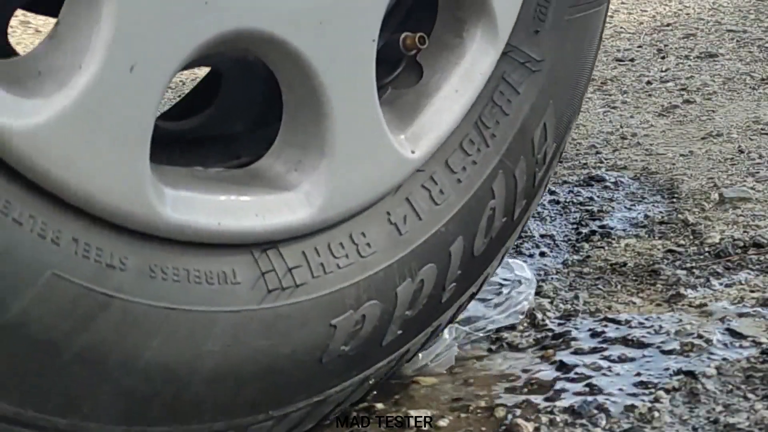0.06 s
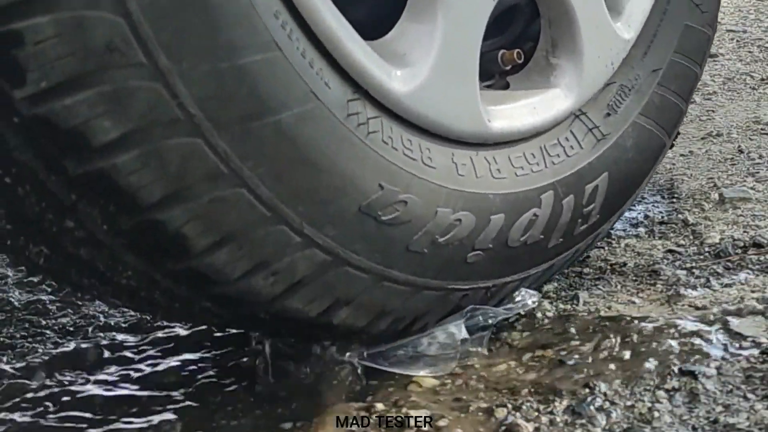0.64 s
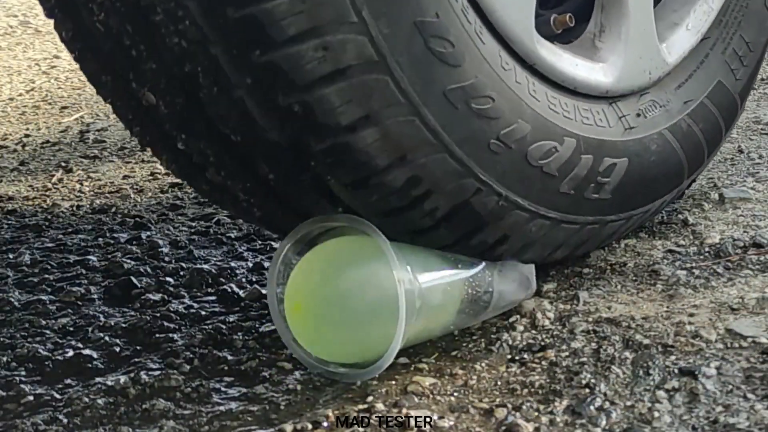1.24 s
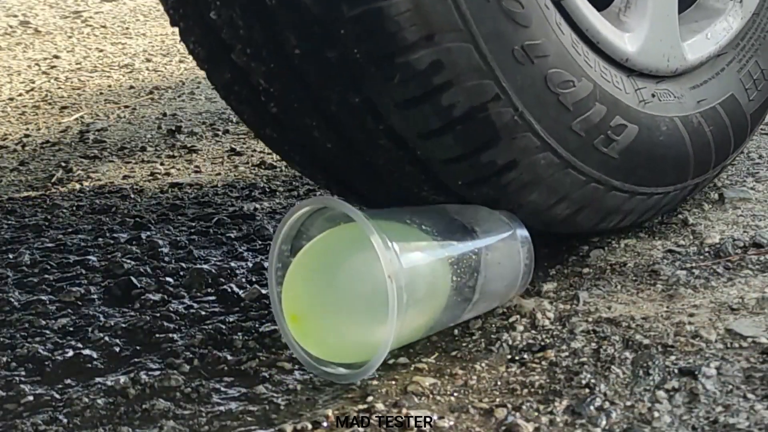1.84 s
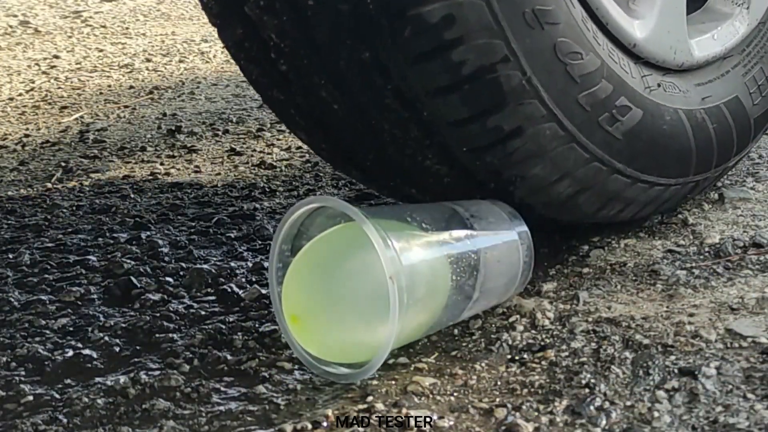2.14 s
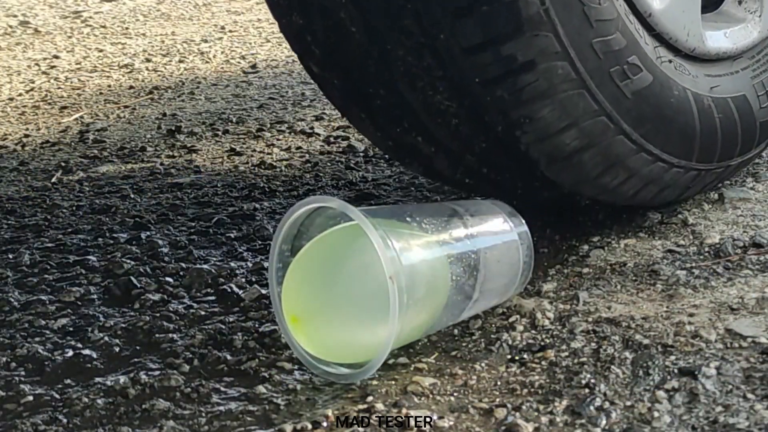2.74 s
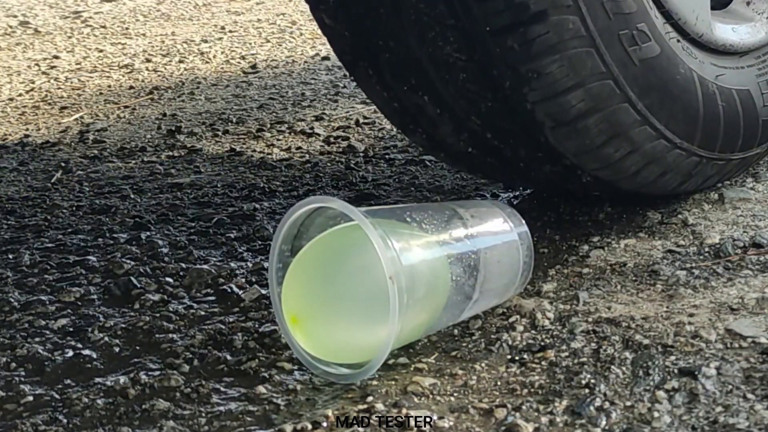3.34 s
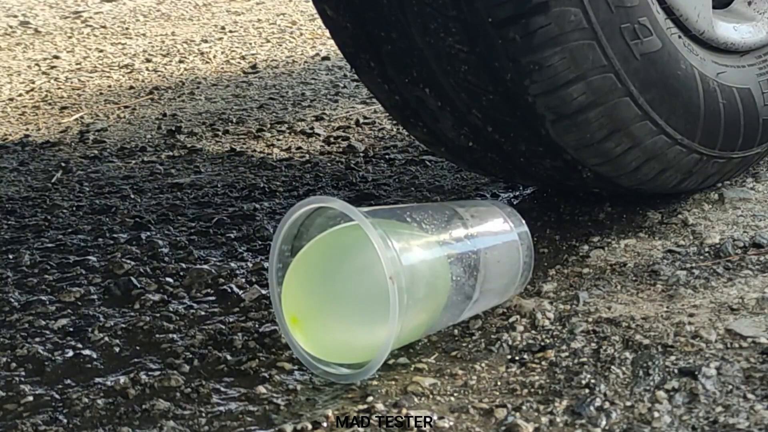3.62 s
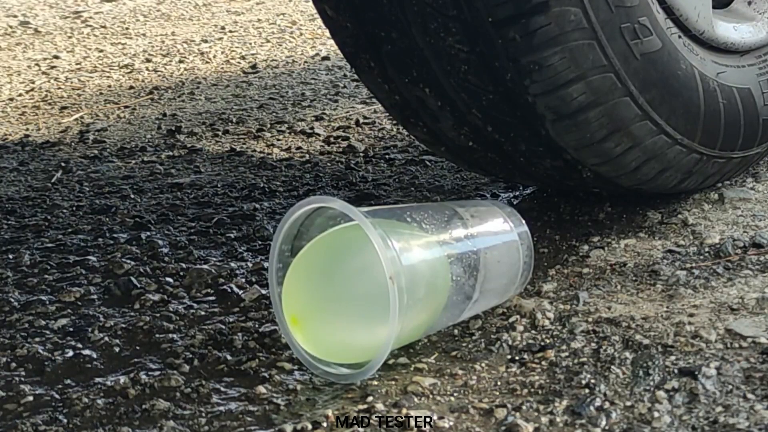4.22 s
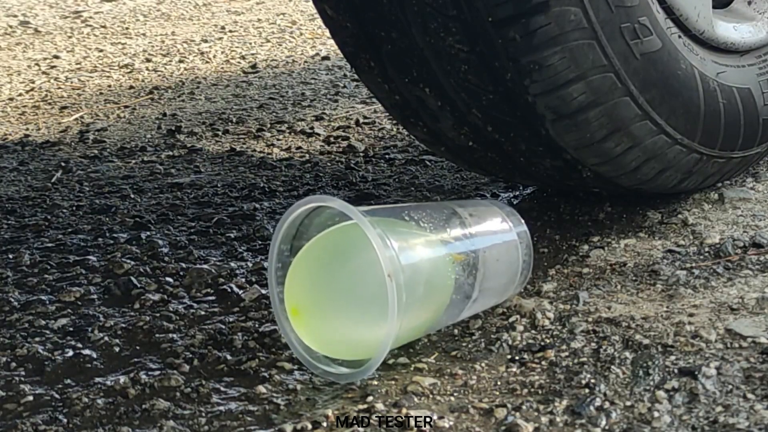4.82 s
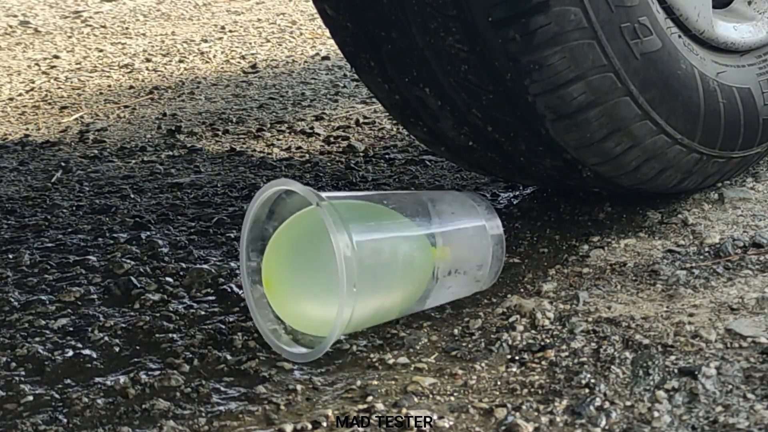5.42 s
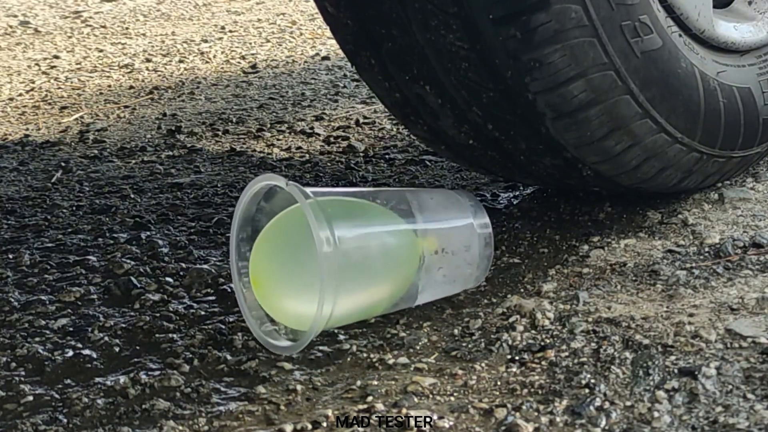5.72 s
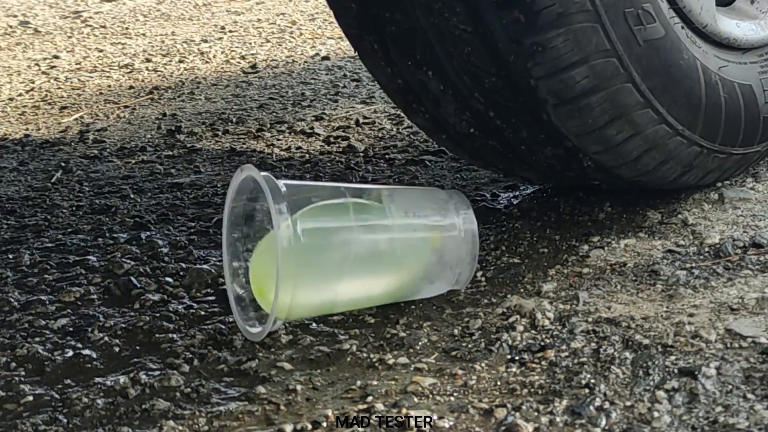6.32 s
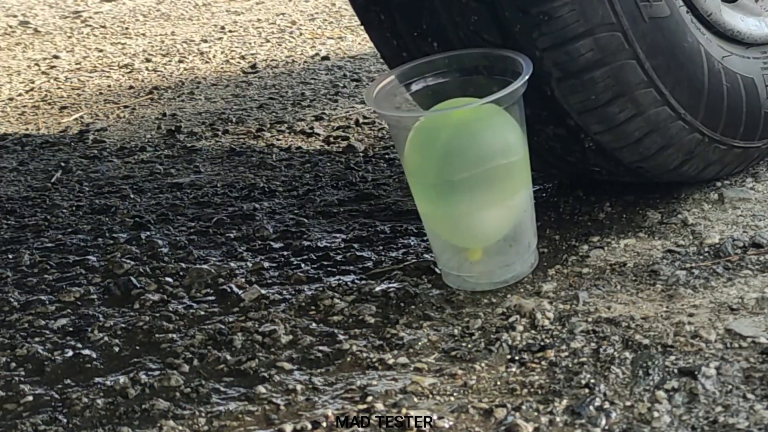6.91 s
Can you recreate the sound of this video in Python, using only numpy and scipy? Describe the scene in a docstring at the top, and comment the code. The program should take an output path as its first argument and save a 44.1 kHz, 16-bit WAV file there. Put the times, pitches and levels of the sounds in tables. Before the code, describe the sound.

Everything sounds backwards, close up and outdoors: each hit swells and stops dead, over a faint, low car idle. At first a tyre grinds and clicks on wet gravel, with a hollow plastic pop at about 0.5 seconds. From 0.8 to 1.9 seconds thin plastic cups buckle in a loud, dense run of sharp snaps and crinkles, mixed with short thumps and high, fizzy squirts from a water balloon. From 2 to 3.5 seconds the gravel thins to quiet, scattered clicks. A brief rasping squeak comes near 3.6 seconds, then mostly the engine hum. From about 4.7 seconds a cup taps and scrapes on the stones, squeaking again around 5.5. Its hollow knocks and dragging build to their loudest between 6.1 and 6.3 seconds, then drop to light taps and faint scraping until about 7 seconds.

```python
"""Plastic crunches and snaps in reverse over a low idle: every hit swells out of its scatter and stops dead.
It is a car tyre rolling over thin plastic cups of water balloons on wet gravel, all running backwards.
Stones grind and click under the tread, cup walls crease and buckle, a balloon thumps and squirts.
The car creeps away, and a last cup scrapes and knocks hollowly on the stones as it rights itself."""
import sys
import numpy as np
from scipy import signal
from scipy.fft import rfft, irfft, next_fast_len
from scipy.io import wavfile

SR = 44100
rng = np.random.default_rng(int(sys.argv[2]) if len(sys.argv) > 2 else 0)


def put_to_file(sound):
    """Save the sound as 16-bit audio at rate SR, in the file named by the first command-line argument."""
    columns = np.atleast_2d(sound).T  # one column per channel
    safe = np.clip(columns, -1, 1)
    whole_steps = np.round(safe * 32767)
    wavfile.write(sys.argv[1], SR, whole_steps.astype(np.int16))


N = 311331
TIME = np.arange(N) / SR
PORT_LAG_S, DRAG_STOP_S = .00012, .0051

# the tyre on wet gravel, until it comes to rest: t/s, grind/dB, crackle/dB
TYRE_ROLL = [(0, -46, -48.5), (0.27, -53, -56.5), (0.55, -44.5, -46), (0.64, -52, -49), (0.73, -42, -41.5),
             (0.96, -48.5, -45.5), (1.25, -46.5, -48.5), (1.44, -41.5, -43.5), (1.54, -61, -52),
             (1.7, -49.5, -45.5), (1.94, -52, -54), (2, -58.5, -66), (2.62, -58.5, -60.5),
             (2.9, -60.5, -68), (3.45, -64.5, -68.5), (3.66, -67.5, -90)]
# a cup drags harder and harder until it catches: end/s, hollow/dB, crackle/dB
CUP_DRAGS = [(1.7, -49, -48.5), (1.93, -43.5, -47), (5.301, -62, -55), (5.461, -49.5, -60.5),
             (5.78, -67, -55), (5.965, -61.5, -62), (6.3, -35, -56.5), (6.412, -54.5, -50),
             (6.68, -67.5, -61), (7.043, -63, -57)]


def from_db(db):
    """Decibels to gain."""
    return 10 ** (np.asarray(db) / 20)


def joined_db(db, gain):
    """Level of two unrelated sounds together, one in dB and one as a gain."""
    return 20 * np.log10(np.hypot(from_db(db), gain))


def rms_one(x):
    """Scale to unit rms."""
    return x / np.sqrt(np.mean(x ** 2) + 1e-20)


def in_time(rows):
    """Each column of an automation curve, at every sample."""
    times, *columns = np.transpose(rows)
    return [np.interp(TIME, times, column) for column in columns]


def at_hz(points, hz):
    """Read an EQ curve in dB on a log-frequency axis."""
    f, db = np.transpose(points)
    return np.interp(np.log(hz + 1), np.log(f), db)


def colour(x, gain):
    """Filter by a gain that is a function of frequency; unit rms."""
    size = next_fast_len(x.shape[-1], True)
    hz = np.arange(size // 2 + 1) * SR / size
    return rms_one(irfft(rfft(x, size) * gain(hz), size)[..., :x.shape[-1]])


def equalise(x, curve):
    """Shape by an EQ curve; unit rms."""
    return colour(x, lambda hz: from_db(at_hz(curve, hz)))


def pan(db):
    """Stereo gains, db being left minus right."""
    return from_db([[db / 2], [-db / 2]])


def ports(x, lag_s=PORT_LAG_S):
    """Direct sound reaches the left microphone a little before the right."""
    delayed = np.clip(np.arange(len(x)) - round(lag_s * SR), 0, len(x) - 1)
    return np.array([x, x[delayed]])


def diffuse(size, apart_db):
    """Stereo noise, wider as apart_db lifts each side's own part over the common one."""
    white = rng.standard_normal((3, size))
    return rms_one(ports(white[0]) + from_db(apart_db) * white[1:])


def swell(lead, rise_s, stop_s):
    """A reversed decay: slow growth as the time left (lead) runs out, then an abrupt stop."""
    return np.exp(-np.maximum(lead, 0) / rise_s + np.minimum(lead, 0) / stop_s)


def impulses(per_s, spread_db):
    """Randomly timed spikes, most small and a few large."""
    return (rng.random(N) < per_s / SR) * from_db(spread_db * np.minimum(rng.exponential(1, N), 3.5))


def bursts(per_s, spread_db, length_s):
    """Envelope of tiny fractures or slips, each swelling and stopping dead; unit rms."""
    decay = np.exp(-1 / (length_s * SR))
    energy = signal.lfilter([1], [1, -decay], impulses(per_s, spread_db) ** 2 + 1e-12)
    return rms_one(np.sqrt(energy[::-1]))


def grains(per_s, spread_db, low_hz, high_hz, cycles, pitches=16):
    """Random slips on stone, each a reversed tick at one of a set of pitches."""
    clicks = impulses(per_s, spread_db) * rng.choice([-1, 1], N)
    dealt, ticks = rng.integers(0, pitches, N), np.zeros(N)
    for k, hz in enumerate(np.geomspace(low_hz, high_hz, pitches)):
        r, w = np.exp(-hz / (cycles * SR)), 2 * np.pi * hz / SR
        ring = signal.lfilter([1, 0, -1], [1, -2 * r * np.cos(w), r * r], clicks * (dealt == k) + 1e-18)
        ticks += ring * np.sqrt((1 - r) * w)
    return ports(rms_one(ticks[::-1]))


def wall_db(hz):
    """Lift given by the cup wall's resonances."""
    # wall modes: f/Hz, width/Hz, lift/dB
    modes = [(2800, 270, 1), (3570, 430, 3), (4240, 170, 0.5), (6660, 120, 6.5), (8360, 580, 4.5),
             (10060, 330, 3.5), (12100, 820, 1.5)]
    return sum(db / (1 + (2 * (hz - f) / width) ** 2) for f, width, db in modes)


def ripple_db(hz, step_hz=420, depth_db=3):
    """The close, irregular resonances of one crease, drawn afresh each time."""
    grid = np.arange(0, SR / 2, step_hz)
    return np.interp(hz, grid, rng.normal(0, depth_db, len(grid)))


def hit(lead, crack_db, tilt_db, folds_hz, lift_db, ring_hz, cycles, ring_db, echo_db, scatter_db,
        edge_s, pan_db):
    """One reversed snap or knock: a crack, a short hollow ring, and their scatter off tyre and ground."""
    # tone of cracking plastic: f/Hz, level/dB
    plastic_eq = [(500, -10), (1200, -8), (2200, -2), (4000, 0.5), (8500, -5.5), (11000, -6), (13000, -11),
                  (16000, -20.5)]
    size = len(lead)
    lag_s = PORT_LAG_S * rng.uniform(0.65, 1.4)

    def crack_tone(hz):
        """Each fold adds its own resonances and tilt per octave to the wall's."""
        fold = sum(lift_db / (1 + ((hz / f - 1) / .07) ** 2) for f in folds_hz)
        tilt = tilt_db * np.log2(np.clip(hz, 2000, 11000) / 5000)
        return from_db(at_hz(plastic_eq, hz) + wall_db(hz) + fold + tilt + ripple_db(hz))

    def echo_tone(hz):
        """A band around the ring, with top and bottom rolled off."""
        band = 1 / np.sqrt(1 + (cycles * (hz / ring_hz - ring_hz / (hz + 1))) ** 2)
        return band / (1 + (hz / 3500) ** 2) * hz ** 2 / (hz ** 2 + 150 ** 2)

    noise = [rng.standard_normal(size), diffuse(size, apart_db=12.5), diffuse(size, apart_db=17)]
    noise = colour(np.vstack(noise), crack_tone)
    crack = noise[0] * swell(lead, .00065 + edge_s / 2, edge_s)
    crack = ports(crack / np.sqrt(np.sum(crack ** 2) / ((0.0024 + edge_s) * SR)), lag_s)
    near = from_db(-12.5) * noise[1:3] * swell(lead, .003, 0.0006)
    scatter = from_db(scatter_db + 7) * noise[3:] * swell(lead, 0.014, 0.000386)
    # the air in the cup rings, heavily damped; longer rings peak lower for the same energy
    ring = 3.4 * np.sqrt(ring_hz / 1000 / cycles) * np.sin(2 * np.pi * ring_hz * lead) * (lead > 0)
    ring *= np.exp(-np.abs(lead) * ring_hz / cycles)
    ring *= 1 - np.exp(-np.abs(lead) / (0.24 * edge_s))   # softens the stop
    low_cut = signal.butter(2, ring_hz * 0.29, "high", fs=SR, output="sos")
    ring = ports(signal.sosfilt(low_cut, ring[::-1])[::-1], lag_s)
    echo = from_db(echo_db) * colour(diffuse(size, apart_db=-5), echo_tone) * swell(lead, 0.011, 0.0016)
    # only the short waves of the crack are beamed to one side
    return from_db(crack_db) * pan(pan_db) * (crack + near + scatter) + from_db(ring_db) * (ring + echo)


def place(hits, size=5400, tail=700):
    """Lay each row (t/s, then the settings of a hit) on the timeline."""
    track = np.zeros((2, N + 2 * size))
    lead = (size - tail - np.arange(size)) / SR
    for t, *settings in hits:
        start = round(t * SR) + tail
        track[:, start:start + size] += hit(lead, *settings)
    return track[:, size:size + N]


def waver(per_s=9, depth=.6):
    """A value that wanders around 1."""
    grid = np.arange(0, TIME[-1] + 1, 1 / per_s)
    return np.interp(TIME, grid, rng.normal(1, depth, len(grid)))


def engine():
    """A muffled rumble with wavering harmonics that follow the firing rate, over a bed of open air."""
    # tones of the rumble and the air: f/Hz, level/dB
    rumble_eq = [(25, -47.5), (50, -29.5), (68, -9), (82, -6.5), (97, -0.5), (113, 3), (145, -4.5),
                 (180, -13.5), (205, -11), (270, -14.5), (320, -10), (600, -22.5), (1500, -59.5),
                 (4000, -69)]
    air_eq = [(400, 4.5), (1000, -1), (1500, -5.5), (2400, -15), (4200, -20), (6500, -28.5), (16000, -29)]
    # loudness of the idle: t/s, level/dB
    idle = [(0, -47), (1.1, -48.5), (3.0, -48), (4.4, -46.5), (6.5, -49.3), (6.9, -45.5)]
    # firing rate as the car creeps: t/s, f/Hz
    firing = [(0, 41), (1.3, 41), (2.55, 41.1), (3.0, 38.5), (3.5, 38), (3.9, 42.5), (4.2, 43.3),
              (4.55, 41.7), (5.0, 40.4), (5.3, 39.3), (5.6, 36.5), (7.05, 40)]
    # firing harmonics: multiple, level/dB re rumble
    orders = [(2, -10.5), (3, -10.5), (4, -18), (5, -16), (6, -18)]
    rumble = equalise(diffuse(N, apart_db=-12.5), rumble_eq)
    phase = 2 * np.pi * np.cumsum(in_time(firing)[0]) / SR
    hum = sum(from_db(db) * rms_one(waver() * np.sin(k * phase + waver())) for k, db in orders)
    air = equalise(diffuse(N, apart_db=20), air_eq)
    return from_db(in_time(idle)[0]) * (rumble + hum) + from_db(-56) * air


def drag_gain():
    """Envelope of the cups' hollow dragging."""
    return sum(from_db(db) * swell(end - TIME, 0.18, DRAG_STOP_S) for end, db, _ in CUP_DRAGS)


def gravel():
    """Stones grind under the tread and dragging cups; wet grit and creased plastic crackle on top."""
    # tones of the stones and the grit: f/Hz, level/dB
    grind_eq = [(200, -19), (450, 1), (800, 2), (1100, -5), (1600, -1), (2400, -20.5), (4500, -30.5)]
    grit_eq = [(1000, -18), (2200, 0.5), (4000, 0), (8500, -5.5), (11000, -10.5), (13000, -11),
               (16000, -26.5)]
    tyre_db, grit_db = in_time(TYRE_ROLL)
    grind_db = joined_db(tyre_db, from_db(-6.5) * drag_gain())
    crushing = bursts(per_s=100, spread_db=-1, length_s=0.0015)
    load = np.clip((grind_db + 56) / 16, 0, 1)   # stones only tick under a heavy load
    ticks = load * grains(per_s=330, spread_db=1.5, low_hz=700, high_hz=1950, cycles=0.98)
    stones = ticks + (1.1 * crushing + 1.3) * diffuse(N, apart_db=10.5)
    grit = crushing * diffuse(N, apart_db=10) + from_db(0.5) * diffuse(N, apart_db=11)
    strays = bursts(per_s=9, spread_db=1.5, length_s=0.00072) * diffuse(N, apart_db=0)
    grit = colour(grit + from_db(-14.5) * strays, lambda hz: from_db(at_hz(grit_eq, hz) + wall_db(hz)))
    return from_db(grind_db) * equalise(stones, grind_eq) + from_db(grit_db + 1) * grit


def rubbing():
    """A rim rubs under the tyre or drags over stones, and the weighted cup answers hollowly."""
    # tone of the cup's body: f/Hz, level/dB
    hollow_eq = [(110, -20.5), (210, 5), (320, -3.5), (420, -4), (600, -5), (780, -15.5), (1200, -21.5),
                 (3000, -44.5)]
    slips = grains(per_s=420, spread_db=2.5, low_hz=234, high_hz=640, cycles=2)
    slips += from_db(-2.5) * diffuse(N, apart_db=-7)
    level_db = joined_db(in_time(TYRE_ROLL)[0] - 7.5, drag_gain())
    return from_db(level_db) * equalise(slips, hollow_eq)


def pinches(tilt_db=-2, facet_hz=3300, lift_db=1, cycles=2.6, echo_db=-7, scatter_db=-14,
            edge_s=0.00066, pan_db=-3):
    """Stones pinched by the tread click, each at its own pitch."""
    # stone clicks: t/s, crack/dB, ring/Hz, ring/dB
    clicks = [(0.0258, -45, 1500, -54), (0.0838, -35, 1140, -38), (0.107, -36.5, 1840, -34),
              (0.1914, -36, 1760, -38), (0.2062, -33.5, 1000, -38), (0.219, -40, 1270, -45),
              (0.2388, -51, 1500, -59), (0.2712, -42.5, 1500, -52), (0.3077, -37.5, 1670, -46),
              (0.345, -31.5, 1550, -28), (0.3922, -35.5, 1500, -42), (0.4636, -38, 1500, -43),
              (0.5357, -41, 1800, -43), (0.58, -34, 1450, -37.5), (0.706, -39, 1200, -43),
              (0.713, -47, 1500, -52), (0.388, -37, 1280, -28), (0.4522, -42, 1690, -31.5),
              (0.483, -33, 1580, -52), (0.611, -33.5, 1670, -37), (0.661, -36, 1420, -41),
              (0.697, -48, 870, -27.5), (0.745, -50, 1500, -26), (2.075, -53, 1350, -48),
              (2.158, -53, 1290, -62), (2.2119, -50, 1130, -48), (2.25, -74, 1340, -55.5),
              (2.33, -48.5, 1400, -59), (2.354, -48.5, 1290, -53), (2.39, -47, 1190, -40.5),
              (2.4517, -57, 1080, -50), (2.4892, -69, 1340, -41.5), (2.539, -49, 990, -50.5),
              (2.5628, -48, 1160, -51), (2.585, -46, 3200, -40), (2.6157, -59, 1100, -54),
              (2.625, -60, 1300, -49), (2.7307, -62, 1160, -54), (2.755, -48, 1120, -46),
              (2.8097, -48.5, 1570, -44.5), (2.915, -66, 3520, -50.5), (3.093, -57.5, 958, -62),
              (3.408, -56, 1610, -47), (3.424, -49.5, 1540, -44)]
    return place((t, db, tilt_db, (facet_hz,), lift_db, ring_hz, cycles, ring_db,
                  echo_db, scatter_db, edge_s, pan_db) for t, db, ring_hz, ring_db in clicks)


def spray():
    """Water squirts from a squeezed balloon; the droplets fizz high above the crunch."""
    # squirts: end/s, level/dB
    squirts = [(0.875, -43), (1.16, -40.5), (1.42, -46.5), (1.69, -43)]
    # tone of the droplets: f/Hz, level/dB
    fizz_eq = [(4000, -25), (9000, -5.5), (12500, -1), (14500, -2.5), (16000, -8)]
    flow = sum(from_db(db) * swell(end - TIME, rise_s=0.15, stop_s=.008) for end, db in squirts)
    drops = bursts(per_s=500, spread_db=2.5, length_s=0.0006) * diffuse(N, apart_db=4)
    return flow * equalise(drops, fizz_eq)


def squeaks():
    """The rim sticks and slips: each slip rasps and rings the cup's modes, swelling to a dead stop."""
    # rim slips: end/s, level/dB
    slips = [(3.575, -44.5), (3.614, -42), (5.472, -50), (5.515, -44.5), (5.563, -44.5), (6.659, -64)]
    # modes of the whole cup: f/Hz, rise/s, level/dB
    modes = [(315, 0.044, -1.5), (530, 0.025, -5), (789, 0.016, -8), (1550, 0.013, -13.5),
             (3140, 0.018, -10), (3330, 0.013, -3), (4520, .02, -25)]
    # tone of the scrape: f/Hz, level/dB
    rasp_eq = [(200, -22), (400, 6), (750, 4), (1300, -11.5), (3000, -20.5), (5000, -17.5), (9000, -32)]
    kicks, chirps = np.zeros(N), np.zeros(N)
    for end, db in slips:
        kicks[round(end * SR)] = from_db(db)
    for hz, rise_s, db in modes:
        r, w = np.exp(-1 / (rise_s * SR)), 2 * np.pi * hz / SR
        ring = signal.lfilter([0, np.sin(w)], [1, -2 * r * np.cos(w), r * r], kicks[::-1] + 1e-18)[::-1]
        # the rim's grip comes and goes
        flutter = 1 + .7 * colour(rng.standard_normal(N), lambda f: 1 / (1 + (f / 70) ** 4))
        chirps += from_db(db) * ring * flutter
    scrape = sum(from_db(db + 3) * swell(end - TIME, rise_s=0.018, stop_s=0.00074) for end, db in slips)
    return ports(chirps) + scrape * equalise(diffuse(N, apart_db=16), rasp_eq)


def creasing():
    """Crumpled and dragged plastic crackles with tiny creases, coloured by the cup wall."""
    # a wall crumples: end/s, level/dB
    crumples = [(0.942, -22.5), (1.0, -40.5), (1.115, -29.5), (1.152, -35.5), (1.48, -33), (1.665, -33),
                (1.811, -32.5)]
    # tone of the creases: f/Hz, level/dB
    crinkle_eq = [(1000, -20), (2200, 3), (4000, 2.5), (8500, -0.5), (11000, -6.5), (13000, -9.5),
                  (16000, -17.5)]
    crumpled = sum(from_db(db) * swell(end - TIME, 0.051, 0.0028) for end, db in crumples)
    dragged = sum(from_db(db) * swell(end - TIME, 0.19, DRAG_STOP_S) for end, _, db in CUP_DRAGS)
    creases = bursts(per_s=280, spread_db=2.4, length_s=0.0008) * diffuse(N, apart_db=7.5)
    hiss = from_db(-4) * diffuse(N, apart_db=7)
    crackle = colour(creases + hiss, lambda hz: from_db(at_hz(crinkle_eq, hz) + wall_db(hz)))
    return from_db(-2) * (crumpled + dragged) * crackle * pan(-3)


def thumps():
    """A cup or balloon gives way: escaping air makes one swing of pressure, down and then up."""
    # puffs of air: t/s, peak/dB, half width/s
    puffs = [(0.8005, -13.5, 0.0002), (0.858, -16, 0.0008), (0.9374, -19.5, 0.00092),
             (1.4878, -15.5, 0.0012), (1.811, -26, 0.0003)]
    pressure = np.zeros(N)
    for t, db, width in puffs:
        u = (TIME - t) / width
        pressure += from_db(db) * u * np.exp(1 - np.minimum(np.abs(u), 50))
    return ports(pressure)


def pop(end_s=.5239, peak_lead_s=.0022):
    """A flattened cup pops hollowly under the tread, its modes ringing for a few milliseconds."""
    # modes of the flattened cup: f/Hz, level/dB
    modes = [(480, -19.5), (1450, -12.5), (3050, -15.5), (3650, -20), (5300, -25), (6800, -22), (8450, -29),
             (10400, -26.5)]
    lead = np.maximum(end_s - TIME[:SR], 0)
    u = lead / peak_lead_s
    ring = sum(from_db(db) * np.cos(2 * np.pi * hz * (lead - peak_lead_s)) for hz, db in modes)
    ring *= (u * np.exp(1 - u)) ** 4
    return ports(np.pad(ring, (0, N - SR)), lag_s=.0001) * pan(-2.5)


def any_facet(low_hz=2900, high_hz=8430):
    """The resonance of a random spot on the cup, in Hz."""
    return low_hz * (high_hz / low_hz) ** rng.random()


def knocks(tilt_db=-0.5, dulling=0.45, lift_db=4.5, echo_db=-10, scatter_db=-14, pan_db=-3.5):
    """The last cup hits the stones: rim taps are bright, blows with the balloon's weight are dull."""
    # taps and blows: t/s, crack/dB, ring/Hz, ring/dB, ring length/cycles, edge/s
    blows = [(3.612, -53.5, 801, -51, 2, 0.002), (4.741, -45, 401, -58, 1.75, 0.00088),
             (4.9455, -45.5, 895, -55, 1.8, 0.0003), (4.96, -39, 2190, -38, 2.4, 0.0048),
             (5.014, -50, 600, -52, 2, 0.00074), (5.036, -56, 600, -60, 2, 0.0004),
             (5.08, -40, 440, -57, 2, 0.0038), (5.112, -43.5, 466, -42, 1.2, 0.0015),
             (5.189, -42, 540, -43, 2, 0.0045), (5.221, -43, 500, -60, 2, 0.0006),
             (5.2464, -46, 600, -60, 2, 0.0005), (5.273, -37, 1430, -45, 2.8, 0.00039),
             (5.294, -34.5, 530, -41.5, 1.8, 0.00049), (5.319, -38.5, 394, -36.5, 2.3, 0.0026),
             (5.3537, -47, 600, -53, 2, 0.0005), (5.371, -39, 665, -52, 1.6, 0.00038),
             (5.425, -45, 553, -38.5, 3.2, 0.00086), (5.452, -40.5, 387, -76, 2, 0.0014),
             (5.46, -44.5, 700, -45, 1.8, 0.00043), (5.7162, -27, 397, -34, 1.8, 0.00095),
             (5.723, -26.5, 364, -34.5, 2, 0.0054), (5.8434, -37.5, 347, -32.5, 1.2, 0.0003),
             (5.8732, -52, 500, -50, 1.5, 0.0006), (5.917, -41, 530, -39, 5.1, 0.00033),
             (5.9426, -37, 455, -25.5, 3.3, 0.0019), (5.9793, -54.5, 450, -51, 1.5, 0.0006),
             (6.0497, -38, 428, -24.5, 3.2, 0.0079), (6.0635, -27.5, 316, -24.5, 0.92, 0.00035),
             (6.091, -57, 385, -34, 2, 0.0018), (6.0963, -47, 600, -50, 1.5, 0.0005),
             (6.148, -47, 465, -30, 5.7, 0.002), (6.153, -22.5, 400, -11.5, 1.06, 0.0012),
             (6.2193, -26.5, 513, -20.5, 5.2, 0.00051), (6.235, -39, 330, -23, 1.4, 0.001),
             (6.2536, -30, 287, -22.5, 1.6, 0.0012), (6.258, -38, 1500, -24, 1.2, 0.002),
             (6.304, -15, 580, -9.5, 4.3, 0.0023), (6.305, -25, 291, -16.5, 2.5, 0.00094),
             (6.3069, -17.5, 1520, -20.5, 1.4, 0.00036), (6.345, -56, 900, -52, 1.5, 0.0006),
             (6.3635, -48, 700, -46, 1.2, 0.0005), (6.391, -49, 540, -38, 6.3, 0.0036),
             (6.5128, -50.5, 533, -43, 2.7, 0.0061), (6.623, -55, 896, -51, 1.4, 0.00065),
             (6.6527, -47.5, 434, -47, 2, 0.00069), (6.6722, -51, 500, -55, 1.5, 0.0006),
             (6.759, -49, 368, -51.5, 2.3, 0.0015), (6.831, -52.5, 504, -47, 1.5, 0.0006),
             (6.851, -49, 520, -51, 2.7, 0.0015), (6.9287, -43, 1120, -40, 0.68, 0.0002),
             (6.975, -37.5, 1610, -49.5, 2.4, 0.00071)]
    return place((t, db, tilt_db - dulling * (ring_db - db), (any_facet(), any_facet()), lift_db,
                  ring_hz, cycles, ring_db, echo_db, scatter_db, edge_s, pan_db)
                 for t, db, ring_hz, ring_db, cycles, edge_s in blows)


def snaps(cycles=1.3, echo_db=4, openness=.45):
    """Cups buckle under the tyre; each fold has two resonances, and one that scatters little rings dry."""
    # folds flipping: t/s, crack/dB, tilt/dB per octave, fold 1/Hz, fold 2/Hz, their lift/dB,
    # ring/Hz, ring/dB, scatter/dB, edge/s, left minus right/dB
    folds = [(0.512, -23.5, -9, 3390, 2900, 15, 1500, -30, -21, 0.0016, -5),
             (0.5229, -18.5, -2.5, 3010, 10400, 7.5, 520, -24.5, -28, 0.0006, -2),
             (0.7653, -24.5, 1, 3400, 9000, -5, 1680, -24, -22, 0.0007, 1),
             (0.779, -18, 5.5, 5900, 8400, -1, 1040, -23, -25, 0.00044, -2.5),
             (0.7915, -20, 0, 4600, 9930, -7, 1500, -16, -25, 0.0046, 1),
             (0.8004, -18, -0.5, 4040, 7260, 1, 359, -20, -33, 0.0003, 0),
             (0.8586, -11, 4, 3570, 10000, 2, 1100, -24, -12.5, 0.0004, -1.5),
             (0.8837, -17, -5, 4490, 10400, 6, 1460, -15.5, -28.5, 0.00026, 9),
             (0.9025, -23.5, 1, 3090, 8320, -2, 935, -32.5, -13, 0.001, 3),
             (0.9139, -20.5, -1, 4720, 10250, 7, 1100, -22, -15, 0.002, -0.5),
             (0.9373, -8, 4, 4650, 9790, 4, 930, -20.5, -18, 0.00078, -2),
             (0.945, -25.5, 2.5, 4570, 9800, 12.5, 900, -43, -16.5, 0.0008, -0.5),
             (0.979, -28.5, -6, 3900, 8400, 7, 730, -29, -18.5, 0.0015, 1.5),
             (1.0026, -12.5, -0.8, 5330, 8430, 3.5, 1515, -29.5, -14.5, 0.0002, 0.5),
             (1.039, -29, -5, 3900, 7800, 3, 840, -30, -28.5, 0.001, -2.5),
             (1.0584, -25, -3, 4810, 10080, 8.5, 1070, -24, -17, 0.0012, -2.5),
             (1.0757, -13, -4.5, 3264, 9050, 13, 890, -20.5, -28.5, 0.000063, -3.5),
             (1.083, -26.5, 16, 4500, 9000, 9, 900, -46.5, -27.5, 0.0003, 0),
             (1.1062, -22.5, 13, 3400, 9500, 4, 900, -45, -11, 0.0006, -1),
             (1.133, -17, 1, 2810, 9680, 5, 780, -26, -16, 0.0003, -0.5),
             (1.1474, -12, 0.7, 5250, 6800, 3, 850, -28, -14, 0.00029, 3),
             (1.176, -32, 3, 4170, 8000, 9, 1040, -30, -6.5, 0.00065, -2.5),
             (1.213, -17, 2.5, 5000, 6450, 15.5, 1700, -28, -30.5, 0.00018, -4),
             (1.241, -27, 6.5, 3370, 8400, 9, 1000, -34.5, -14.5, 0.00028, -6),
             (1.246, -37, 5.5, 4200, 9000, 4, 1000, -52, -18, 0.0004, -4),
             (1.272, -27, -3.5, 3740, 7600, -2.5, 1560, -34, -26.5, 0.00056, 0),
             (1.3283, -17.5, 6.5, 3900, 8600, 8, 1500, -22.5, -15.5, 0.00033, -4),
             (1.3403, -23.5, -7, 2870, 7000, -4, 1080, -24.5, -33, 0.00089, 0),
             (1.3584, -33, 11, 4200, 8340, 7, 1290, -56, -19, 0.00087, 0),
             (1.406, -20.5, 8, 4290, 6610, 7, 1600, -26, -15.5, 0.00059, -3),
             (1.472, -27, 2.5, 4000, 9000, 3.5, 1020, -25, -12, 0.002, 0.5),
             (1.488, -9, 1, 4430, 8450, 3.5, 1020, -15.5, -14.5, 0.00068, 2),
             (1.5016, -32.5, -5, 4510, 8500, 3.5, 760, -31.5, -5, 0.0004, -3),
             (1.547, -29.5, -6.5, 4430, 10610, 7, 1250, -20, -20, 0.0015, -0.5),
             (1.5566, -12, -2.5, 4436, 7650, 7.5, 1000, -16.5, -18.5, 0.0003, -2),
             (1.578, -33.5, 2, 4400, 8500, 5, 1000, -44, -19.5, 0.0004, -4.5),
             (1.6034, -18.5, 3.5, 3640, 6710, 13.5, 800, -20, -19, 0.000492, -1),
             (1.6101, -30.5, 3.5, 4400, 8200, 7.5, 700, -32.5, -22.5, 0.0004, -3.5),
             (1.628, -18.5, -1, 5030, 8150, 11.5, 553, -21, -14, 0.00023, -2.5),
             (1.6503, -33, 4, 5500, 9400, 1, 700, -33, -10, 0.0005, -4.5),
             (1.6626, -14.5, 4, 5460, 9100, 11, 675, -28.5, -22, 0.00095, -0.5),
             (1.735, -36, 4, 4200, 8500, 1, 800, -43, -4, 0.001, -5),
             (1.8121, -12.5, 1.5, 4176, 6460, 9, 1340, -31.5, -15.5, 0.000471, -3),
             (1.8232, -32, 6, 4500, 10500, 13, 1200, -59, -22, 0.0004, 5),
             (1.839, -32, 7.5, 4200, 8550, 9, 1300, -58.5, -18, 0.0007, -7),
             (1.8533, -51, 9, 4200, 8500, 6.5, 620, -41, -14, 0.00053, 6),
             (1.8724, -39, 7, 4500, 9000, 7, 1200, -62, -29, 0.0004, -13),
             (1.883, -34.5, 10, 4460, 9000, -3, 1200, -58, -19, 0.00052, -4),
             (1.9163, -32, 5.5, 3900, 8500, -2, 1500, -43.5, -11, 0.0027, -0.5),
             (1.965, -43.5, 6, 4250, 8500, 3.5, 1500, -43.5, -5, 0.0009, -3)]
    return place((t, db, tilt_db, (f1, f2), lift_db, ring_hz, cycles, ring_db,
                  echo_db + openness * scatter_db, scatter_db, edge_s, pan_db)
                 for t, db, tilt_db, f1, f2, lift_db, ring_hz, ring_db, scatter_db, edge_s, pan_db
                 in folds)


def scene():
    """Cups, water, ground and engine, close up and in the open."""
    cups = snaps() + pop() + knocks() + creasing() + thumps()
    return cups + spray() + pinches() + gravel() + (rubbing() + squeaks() + engine()) * pan(-1.2)


def record(dry, port_hz=3900, width_hz=2000, lift_db=1, cutoff_hz=15900):
    """The right microphone's port rings a little; the tallest peaks are rounded and the top is cut."""
    b, a = signal.iirpeak(port_hz, port_hz / width_hz, fs=SR)
    left, right = dry
    right = right + (from_db(lift_db) - 1) * signal.lfilter(b, a, right)
    rounded = 1.215 * np.tanh(np.array([left, right]) / 1.273)
    return signal.sosfilt(signal.ellip(10, .1, 80, cutoff_hz, fs=SR, output="sos"), rounded)


dry = scene()
out = record(dry)
put_to_file(out)
```